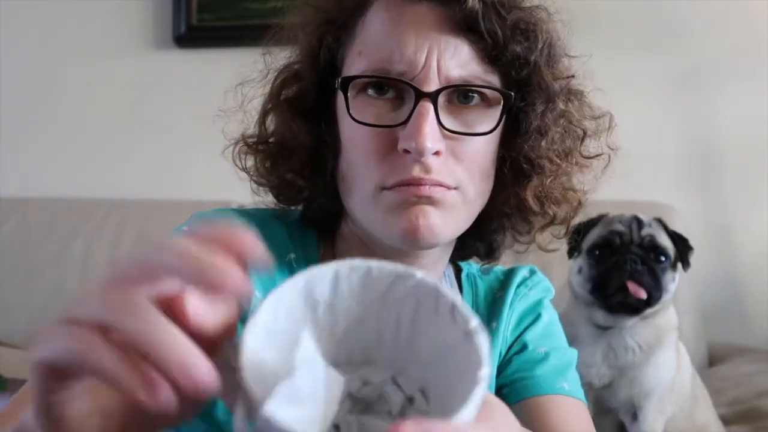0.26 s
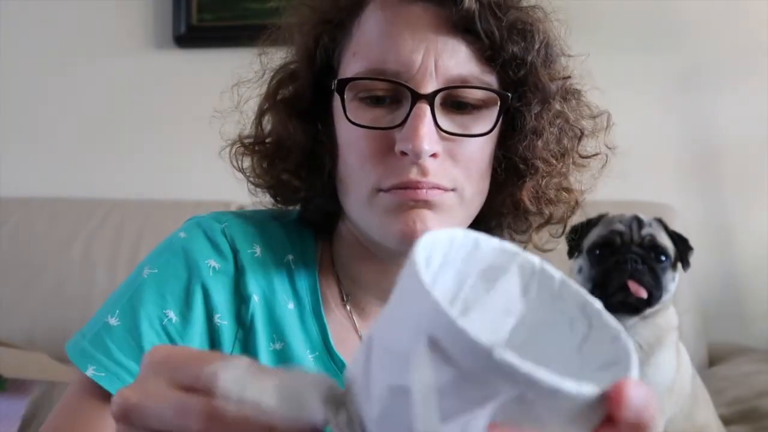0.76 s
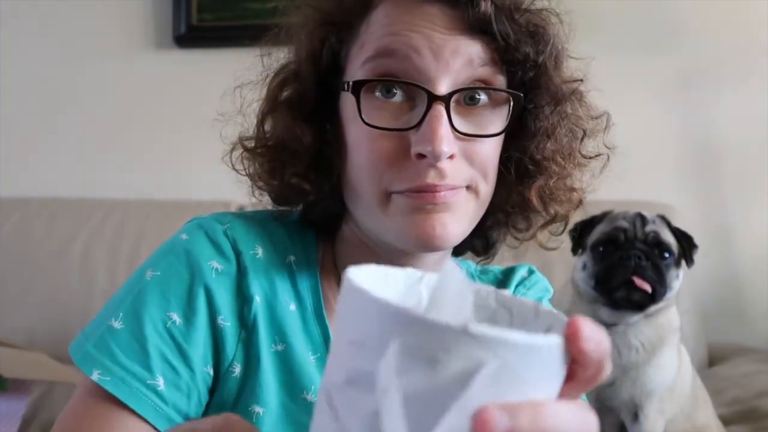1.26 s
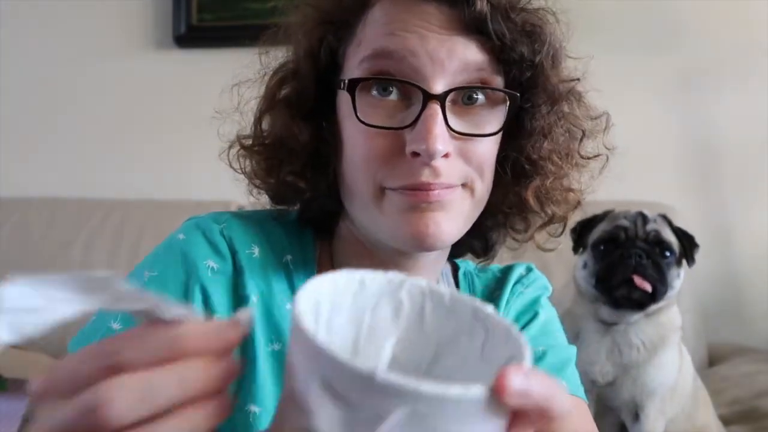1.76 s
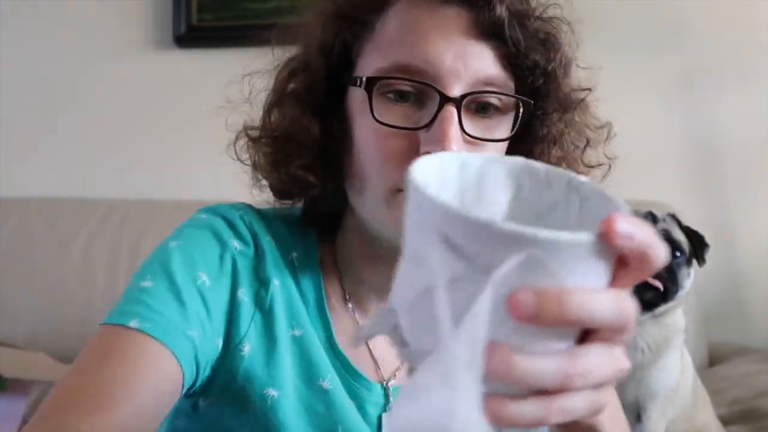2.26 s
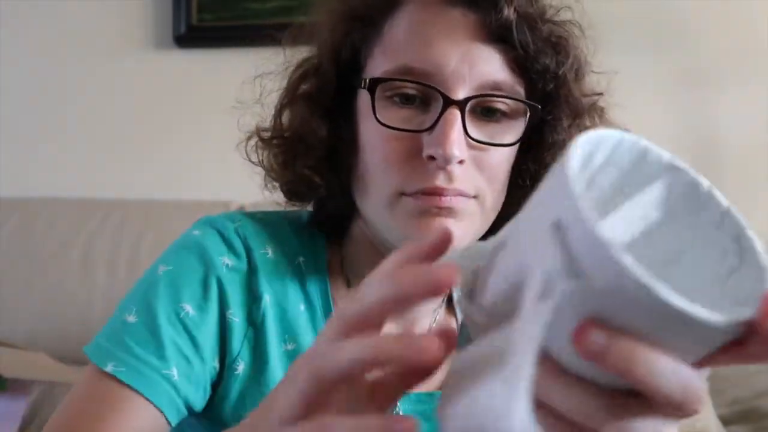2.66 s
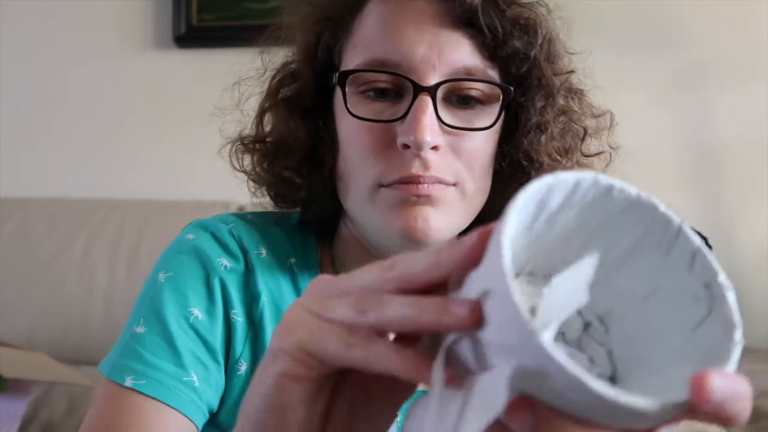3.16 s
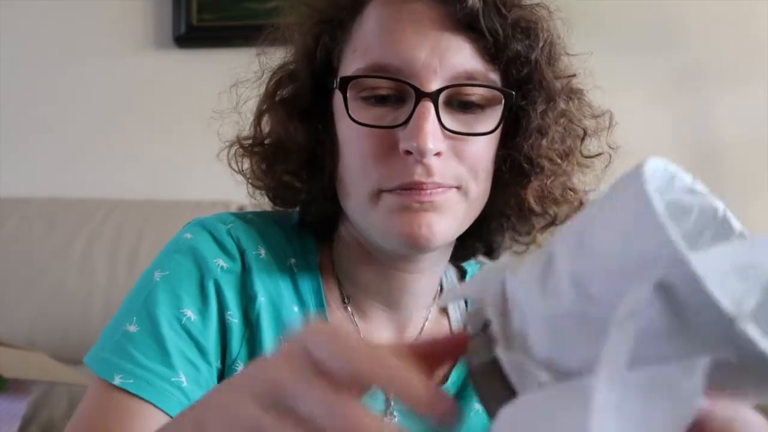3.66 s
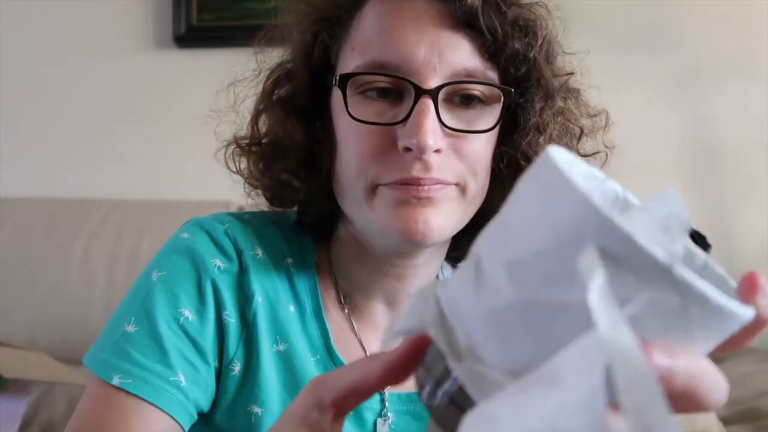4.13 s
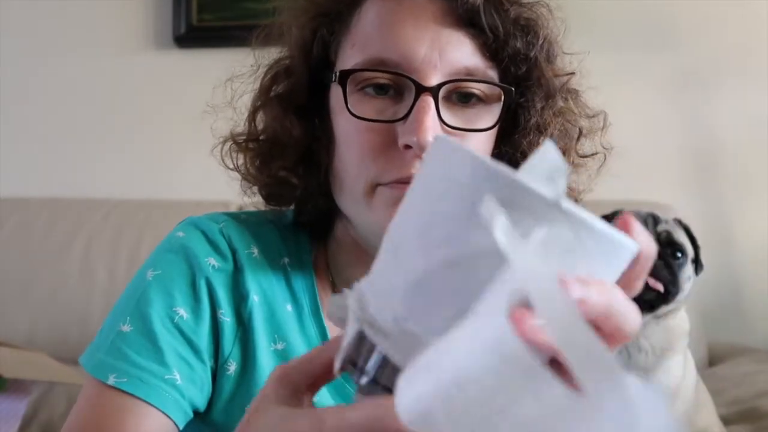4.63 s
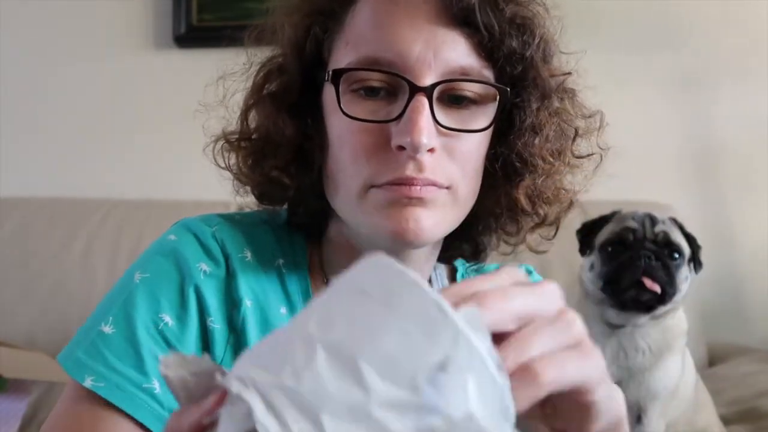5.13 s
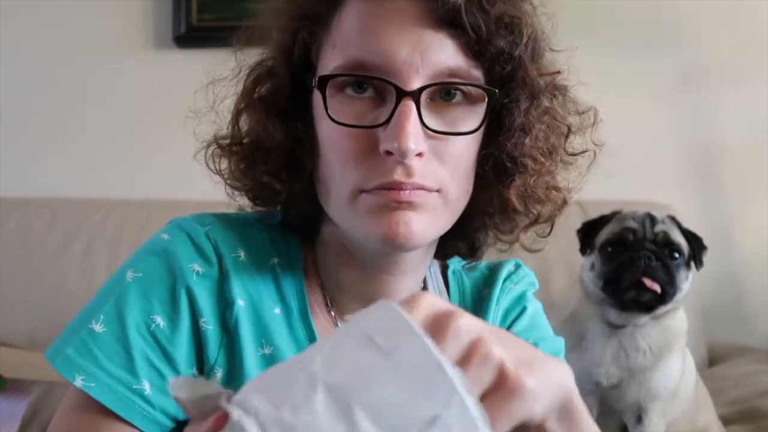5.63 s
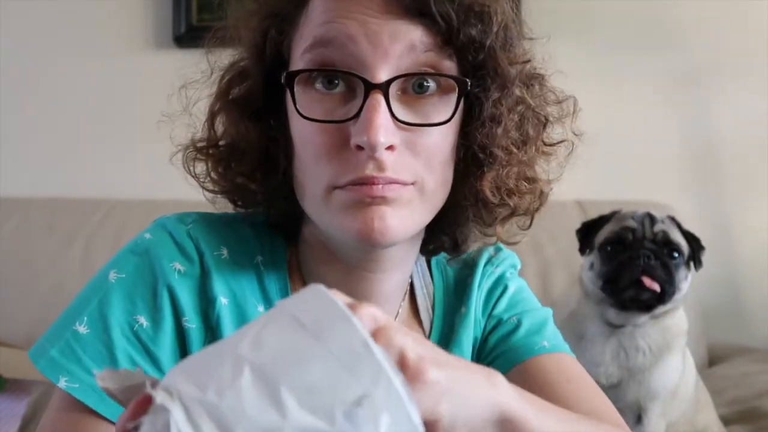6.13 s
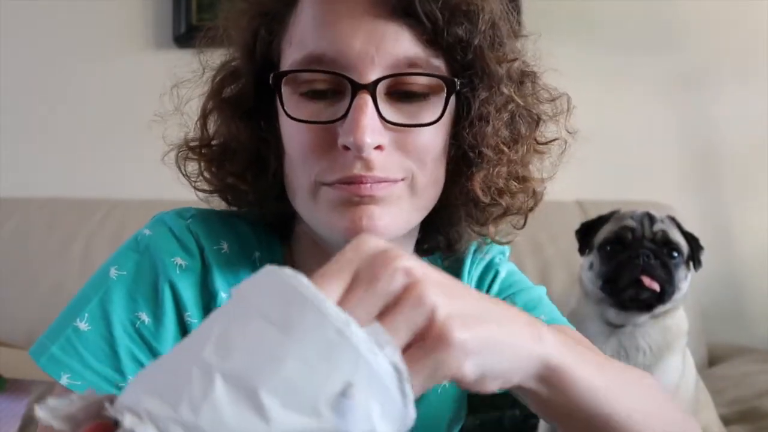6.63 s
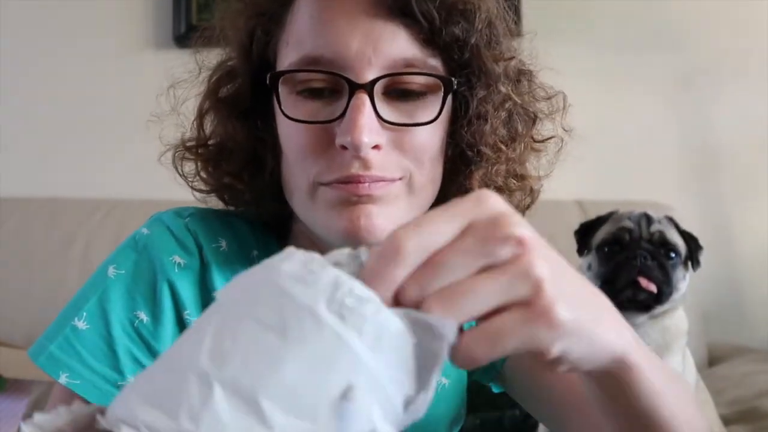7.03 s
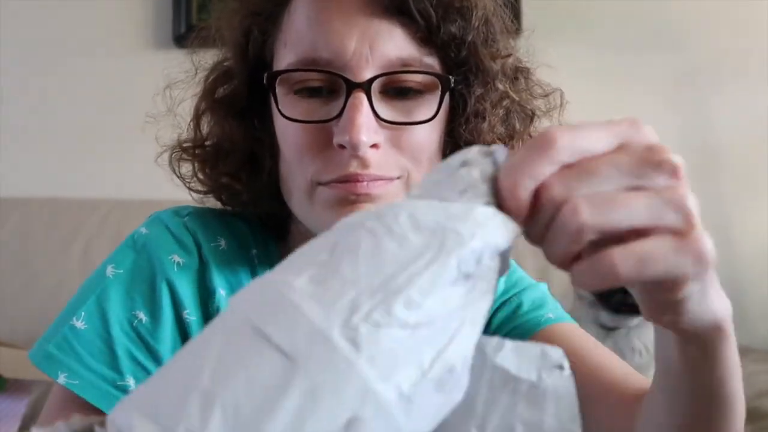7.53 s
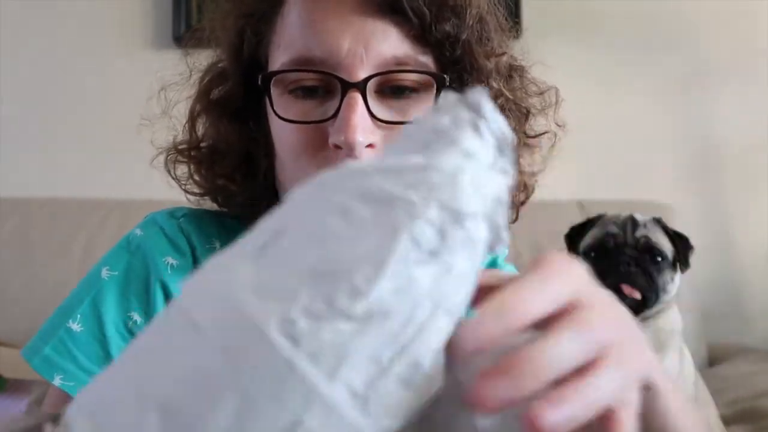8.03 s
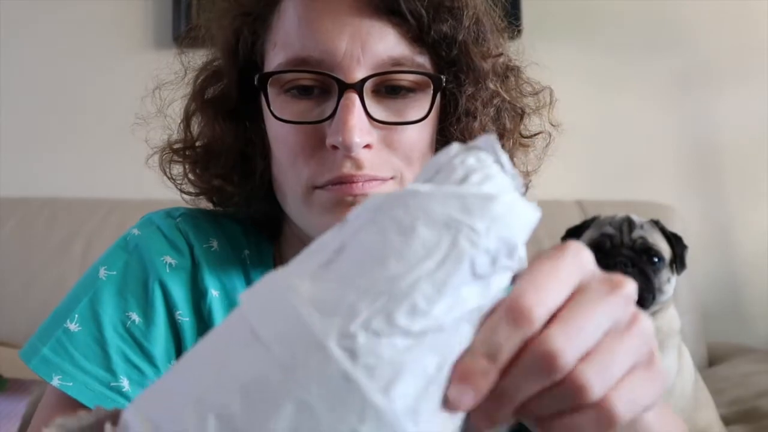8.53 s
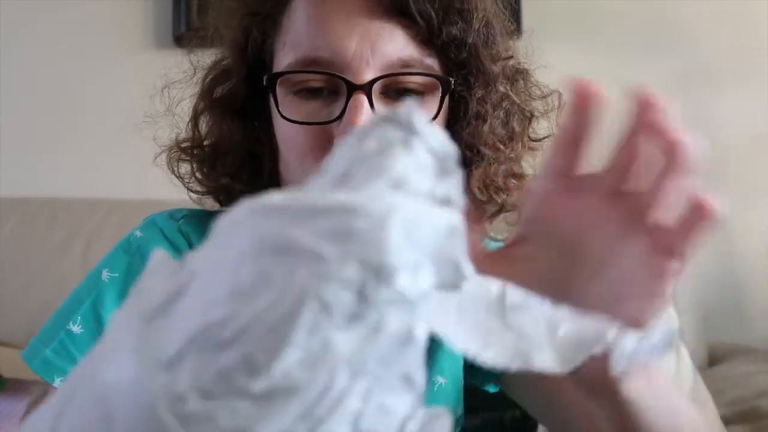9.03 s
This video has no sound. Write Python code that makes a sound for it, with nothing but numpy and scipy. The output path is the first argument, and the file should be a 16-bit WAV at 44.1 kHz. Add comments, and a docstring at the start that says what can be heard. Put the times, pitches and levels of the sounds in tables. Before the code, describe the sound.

Thin paper crackles and rustles close by as hands unwrap a drinking glass, with dull thumps and a hollow ring, growing louder in a quiet room.

```python
"""Unwrapping a drinking glass

Hands peel thin paper off a glass, close to the microphone in a quiet living room. Clouds of tiny clicks ring
at facet pitches to make the rustle; single folds snap as short sagging tones, and the paper chirps as it slips.
Damped sines and scuffs bump the glass, and resonated noise makes its hollow ring while a hand digs the paper out.
Filtered noise and two sines lie below as faint room noise and mains hum."""
import sys
import numpy as np
from scipy import signal
from scipy.fft import rfft, irfft, next_fast_len
from scipy.io import wavfile
from scipy.ndimage import uniform_filter1d

SR = 44100
rng = np.random.default_rng(int(sys.argv[2]) if len(sys.argv) > 2 else 0)


def generate_wav(signal):
    """Clip the signal to [-1, 1] and save it as 16-bit WAV at the path in sys.argv[1]."""
    frames = np.transpose(np.atleast_2d(signal))
    scaled = np.clip(frames, -1, 1) * 32767
    pcm = np.round(scaled).astype(np.int16)
    wavfile.write(sys.argv[1], SR, pcm)


N = 409688
T = np.arange(N) / SR
MODERATE_DB = -40  # effort of a moderate pull


def amp(db):
    """Turns decibels into a linear gain."""
    return 10 ** (np.asarray(db) / 20)


def unit(x):
    """Scales to rms 1."""
    return x / np.sqrt(np.mean(x ** 2) + 1e-20)


def read(points, hz):
    """Reads a spectrum on a log-frequency axis."""
    point_hz, value = np.transpose(points)
    return np.interp(np.log(hz + 1), np.log(point_hz + 1), value)


def curve(rows, axis=1):
    """Draws one column of a control table at every sample."""
    rows = np.asarray(rows)
    return np.interp(T, rows[:, 0], rows[:, axis])


def add(mix, s, sound):
    """Mixes a sound in at time s."""
    part = mix[max(round(s * SR), 0):][:len(sound)]
    part += sound[:len(part)]


def colour(x, points, size=2048):
    """Minimum-phase filter of unit energy: it shapes the tone and keeps the sharp front of clicks."""
    log_gain = np.log(amp(read(points, abs(np.fft.fftfreq(size, 1 / SR)))))
    taps = np.fft.ifft(np.exp(np.conj(signal.hilbert(log_gain)))).real
    return signal.oaconvolve(x, taps / np.linalg.norm(taps))[:len(x)]


def bands(x):
    """Splits into low, middle and high parts that sum to the whole."""
    size = next_fast_len(N)
    hz, z = np.fft.rfftfreq(size, 1 / SR), rfft(x, size)
    low = 1 / (1 + (hz / 1300) ** 8)
    below_high = 1 / (1 + (hz / 5000) ** 8)
    return [irfft(z * gain, size)[:N] for gain in (low, below_high - low, 1 - below_high)]


def wander(seconds):
    """Smooth random drift of rms 1 on the given time scale."""
    size = max(int(seconds * SR), 2)
    return unit(uniform_filter1d(uniform_filter1d(rng.standard_normal(N), size), size))


def drifting_patches(shape, frames):
    """Random time-frequency pattern of rms 1, smoothed over so many frames and over 5 bins."""
    along_time = uniform_filter1d(rng.standard_normal(shape), size=frames, axis=1)
    return unit(uniform_filter1d(along_time, size=5, axis=0))


def steady(x, size=3000):
    """Holds the short-term rms at 1 and leaves the grain."""
    return x / np.sqrt(abs(uniform_filter1d(x ** 2, size)) + 1e-12)


def resonate(x, hz, width):
    """A resonance of gain 1 whose pitch may move."""
    turn = np.exp(2j * np.pi * np.cumsum(hz * np.ones(N)) / SR)
    r = np.exp(-np.pi * width / SR)
    # shift the pitch down to zero, smooth there, shift back up
    return 2 * (turn * signal.lfilter([1 - r], [1, -r], x / turn + 1e-18)).real


# tone of the room noise, both per Hz and relative: pitch_hz, common_db (mid), apart_db (side)
ROOM_NOISE = [(30.2, -7, -27), (60.5, 4.5, -12), (130, 0, -1), (250, -1, 3), (428, -4.5, 1), (760, -9, -6),
              (1600, -10, -15.5), (3000, -12.5, -20), (5700, -15, -12.5), (12000, -33, -24.5)]
# mains hum: pitch_hz, level_db (rms)
MAINS_HUM = [(59.2, -71), (177.6, -77)]
AIR_DB, AIR_SIDE_DB = -53, -55


def background():
    """Soft room noise, wide in the low middle, with a little mains hum as two steady sines."""
    hz, common_db, apart_db = np.transpose(ROOM_NOISE)
    mid = amp(AIR_DB) * colour(rng.standard_normal(N), np.c_[hz, common_db])
    side = amp(AIR_SIDE_DB) * colour(rng.standard_normal(N), np.c_[hz, apart_db])
    for hum_hz, db in MAINS_HUM:
        mid = mid + amp(db) * np.sqrt(2) * np.sin(2 * np.pi * (hum_hz * T + rng.random()))
    return np.array([mid + side, mid - side])


# tone of the echo that still rings as the scene opens: pitch_hz, level_db (per Hz, relative)
OPENING_TONE = [(100, -29), (300, -5), (650, -1.5), (1200, -1), (2600, 5), (3800, 0.5), (5200, 0),
                (7500, -9), (10500, -25), (15500, -40)]
OPENING_DB, OPENING_T60_S = -32.5, 0.99


def opening():
    """The smooth echo of a loud crumple dies away: coloured noise under an exponential decay."""
    fade = np.exp(-np.log(1000) * T / OPENING_T60_S)
    return amp(OPENING_DB) * fade * colour(rng.standard_normal(N), OPENING_TONE)


# room decay: pitch_hz, t60_s
ROOM_DECAY = [(150, 0.26), (1000, 0.35), (4000, 0.59), (12000, 0.37)]


def room(x, gap_s=0.0027):
    """A furnished room: a diffuse noise tail, longest in the low treble and shortest in the bass."""
    hz, t, z = signal.stft(rng.standard_normal(SR // 2), SR, nperseg=256)
    decay = amp(-60 * t / read(ROOM_DECAY, hz)[:, None])
    tail = signal.istft(z * decay, SR, nperseg=256)[1]
    tail *= np.arange(len(tail)) > gap_s * SR
    return signal.oaconvolve(x, tail / np.linalg.norm(tail))[:N]


# stereo width of the handling: pitch_hz, side_db (relative to mid)
HANDLING_WIDTH = [(60, -28), (250, -16), (600, -36), (1200, -82), (2300, -85), (3300, -32), (4500, -7),
                  (7000, -4.5), (10300, 8), (14000, -1)]


def widen(x, scatter=1.58):
    """Spreads the sheet in stereo by a side signal whose phase drifts (scatter in radians), mostly in the treble."""
    hz, t, z = signal.stft(x, SR, nperseg=256)
    turn = 1j * np.exp(1j * scatter * drifting_patches(z.shape, frames=14))
    side_gain = amp(read(HANDLING_WIDTH, hz))[:, None]
    side = signal.istft(z * side_gain * turn, SR, nperseg=256)[1][:N]
    return np.array([x + side, x - side])


# a hand rubs inside the glass and stirs its air: time_s, level_db (at a moderate pull), mouth_hz
REACH_INSIDE = [(4.9, -96, 810), (5.25, -53.5, 794), (5.56, -52.5, 800), (5.6, -40, 870), (5.75, -48, 820),
                (5.95, -51, 764), (6.3, -50, 745), (7.15, -50.5, 744), (7.3, -51.5, 540),
                (8.3, -54.5, 530.2), (9.29, -56.5, 540)]
# fixed air modes of the paper-lined glass: pitch_hz, half_width_hz (of each filter pass), level_db (re the mouth)
GLASS_MODES = [(1720, 200, -5), (2420, 150, -3)]
MOUTH_HALF_WIDTH_HZ = 85
REACH_FOLLOW = 0.74  # dB of ring per dB of pull


def hollow(effort_db, waver=0.025):
    """Rubbing keeps the air in the glass ringing; the mouth resonance shifts as hand and paper cover it."""
    rubbing = rng.standard_normal(N)
    mouth_hz = curve(REACH_INSIDE, axis=2) * (1 + waver * wander(0.13))
    ring = 0
    for hz, half_width, db in [(mouth_hz, MOUTH_HALF_WIDTH_HZ, 0)] + GLASS_MODES:
        once = resonate(rubbing, hz, 2 * half_width)
        ring = ring + amp(db) * steady(resonate(once, hz, 2 * half_width))
    return amp(curve(REACH_INSIDE, axis=1) + REACH_FOLLOW * (effort_db - MODERATE_DB)) * ring


# fingers and broad paper panels thump the glass: start_s, level_db (before the attack), pitch_hz, decay_s
GLASS_BUMPS = [(.013, -20, 650, 0.0027), (.762, -36.5, 417, 0.0026), (.842, -38.5, 570, 0.0058),
               (.969, -35, 900, .002), (3.8572, -28, 1490, 0.001), (3.858, -16.5, 583, 0.0033),
               (3.868, -37.5, 904, 0.019), (3.872, -30, 287, 0.0065), (3.881, -33.5, 152, 0.016),
               (3.9, -37, 100, 0.018), (4.719, -41, 197, 0.012), (5.342, -32.5, 781, 0.0064),
               (5.575, -31, 332, 0.0032), (5.578, -18.5, 785, 0.0041), (5.581, -23, 1810, 0.0023),
               (6.833, -18.5, 344.3, 0.0017), (7.062, -22.5, 451, 0.0035), (7.349, -16, 395, 0.0043),
               (7.399, -16.5, 560, 0.0046), (7.403, -16, 230, 0.0033), (7.42, -23, 400, 0.0046),
               (8.099, -25, 273.2, .005), (8.2195, -19, 417.3, 0.0029), (8.702, -22, 210, 0.0051),
               (8.759, -17, 198.6, 0.0047), (8.786, -9, 436, 0.002), (8.809, -11, 573, 0.006),
               (8.833, -15.5, 480, 0.004)]


def bumps(scuff=0.54, rise_s=0.00016, scuff_hz=1700):
    """Dull knocks, damped by paper and palm: a decaying sine, each with a scuff of noise that just outlasts it."""
    out, t = np.zeros(N), np.arange(6000) / SR
    for s, db, hz, decay in GLASS_BUMPS:
        band = signal.butter(5, [hz / 2, min(3 * hz, scuff_hz)], "band", fs=SR, output="sos")
        rub = unit(signal.sosfilt(band, rng.standard_normal(len(t))))
        knock = np.exp(-t / decay) * np.sin(2 * np.pi * hz * t)
        knock += scuff * np.exp(-t / (1.02 * decay)) * rub
        add(out, s, amp(db) * (1 - np.exp(-t / rise_s)) * knock)
    return out


# the paper slips on the glass: peak_s, level_db (peak)
SLIP_CHIRPS = [(4.588, -6.5), (4.5924, -9), (4.596, -8), (4.6093, -12.5), (4.628, -18)]
SLIP_HZ, SLIP_S = 3300, 0.00072


def slips():
    """Each slip on the glass is a chirp of a few cycles at steady pitch, under a bell-shaped envelope."""
    out, t = np.zeros(N), np.arange(-256, 256) / SR
    bell = np.exp(-np.pi / 2 * (t / SLIP_S) ** 2)
    for s, db in SLIP_CHIRPS:
        add(out, s + t[0], amp(db) * bell * np.cos(2 * np.pi * (SLIP_HZ * t + rng.random())))
    return out


FOLDS_PER_S, FOLDS_GROWTH = 30, .65  # rate at a moderate pull; its growth in dB per dB of pull
FOLD_OVER_DB, FOLD_SPREAD_DB = 5.5, 3.5  # level above the effort; scatter of size
FOLD_HZ = 1900, 4000


def random_folds(effort_db):
    """Folds at random times, as rows like the timed ones: louder and more frequent the harder the pull."""
    rate = FOLDS_PER_S * amp(FOLDS_GROWTH * (effort_db - MODERATE_DB))
    folds = []
    for i in np.flatnonzero(rng.random(N) < rate / SR):
        db = effort_db[i] + FOLD_OVER_DB + FOLD_SPREAD_DB * rng.uniform(-1.1, 1)
        folds.append((T[i], db, rng.uniform(*FOLD_HZ)))
    return folds


# folds that snap at set times, faint to loud: peak_s, level_db (before the shared trim), pitch_hz
TIMED_FOLDS = [(.0125, -3, 2460), (.0199, -1.5, 3300), (.2812, -31, 2500), (.2855, -29, 1590),
               (.667, -26.5, 2655), (.97, -30, 2300), (.9882, -30, 2800), (1.029, -26, 3300),
               (1.036, -25, 3000), (1.079, -26, 3700), (1.1815, -22.5, 3300), (1.1985, -22, 3475),
               (1.2244, -23, 3000), (1.3418, -20, 2370), (1.409, -17, 3200), (1.4258, -18, 2940),
               (1.4363, -15, 3600), (1.5106, -13, 3180), (1.5392, -15, 3456), (1.5473, -19, 3300),
               (1.569, -9, 2850), (1.6951, -19.5, 2240), (1.7062, -25, 2602), (2.2045, -31, 3000),
               (2.4715, -34, 2200), (2.554, -34, 4200), (2.555, -35.5, 1900), (2.5838, -22, 4000),
               (2.611, -41, 3300), (2.624, -34, 2200), (2.6572, -34, 2450), (2.8307, -29.5, 2240),
               (2.8627, -29, 3000), (2.9684, -24, 3040), (3.0133, -18, 3000), (3.0635, -16.5, 3120),
               (3.164, -21.5, 3080), (3.1731, -21.5, 2900), (3.1793, -24, 2770), (3.2251, -23, 2700),
               (3.2405, -19.5, 3950), (3.3079, -24, 2990), (3.3524, -27, 2574), (3.5191, -32.5, 2500),
               (3.5573, -27, 3000), (3.9392, -29, 3170), (3.9487, -20.5, 2340), (3.9675, -15, 3300),
               (4.0636, -26, 2800), (4.0723, -23, 3890), (4.2931, -25, 2530), (4.3068, -16, 3900),
               (4.3254, -18.5, 2580), (4.3837, -23, 3850), (4.832, -21.5, 2900), (4.8625, -18, 2920),
               (4.9831, -24, 2970), (5.0695, -24, 3870), (5.0705, -24.5, 1320), (5.0718, -23, 3000),
               (5.1165, -30, 2800), (5.3395, -29.5, 3000), (5.4486, -22, 2590), (5.5054, -23, 2550),
               (5.5241, -25, 2490), (5.6602, -27, 3250), (5.6783, -23, 2500), (5.733, -23, 3100),
               (5.7964, -27, 3000), (5.9162, -21.5, 2550), (5.9383, -20, 1980), (5.9674, -17, 2220),
               (5.9915, -15, 1787), (6.2685, -22.5, 2390), (6.3734, -23, 2710), (6.4965, -23.5, 2207),
               (6.5622, -19.5, 3064), (6.7006, -22, 2205), (6.7258, -19.5, 2400), (6.8347, -16, 2750),
               (6.8658, -23, 2800), (6.8784, -16, 2920), (6.9815, -19, 2593), (7.0328, -21, 2400),
               (7.0673, -14, 2290), (7.1417, -11, 2640), (7.2833, -14.5, 2623), (7.339, -8, 2882),
               (7.4495, 2, 2790), (7.5973, -15, 3000), (7.854, -13, 2918), (7.9134, -13.5, 2588),
               (8.035, -26, 3240), (8.0998, -16, 3180), (8.1058, -24, 2820), (8.1343, -28, 2770),
               (8.1467, -17.5, 2530), (8.1973, -15, 3440), (8.2207, -16, 2220), (8.2253, -13.5, 2600),
               (8.3664, -10.5, 2600), (8.43, -13.5, 2403), (8.5452, -16, 2800), (8.5568, -15.5, 2040),
               (8.5867, -15.5, 2260), (8.6071, -16, 3570), (8.7244, -10.5, 3110), (8.7876, -1.5, 1960),
               (8.8, -5, 2300), (8.8229, -12, 3420), (8.8375, -8, 2190)]
SNAP_RING_S = 0.0003  # rise time of a flip, about one cycle of its pitch
# a flipped fold trips its neighbours: mean gap, level of the first, step for each further one, pitch scatter
CHAIN_GAP_S, CHAIN_DB, CHAIN_STEP_DB, CHAIN_OCTAVES = .0013, -8, -3.5, .45
CLEAN_BREAK_DB = -1  # a snap at or above this releases the sheet at once and trips no others


def snaps(folds, level_db=-1.4, crack_db=-8, shiver_db=-22, shiver_s=0.01, sag=0.093, count=4):
    """A fold flips with a crack, rings at a sagging pitch and trips a chain of weaker flips; the sheet shivers on."""
    flips, cracks, t = np.zeros(N), np.zeros(N), np.arange(1024) / SR
    age = t / SNAP_RING_S
    sagging_s = np.cumsum(1 + sag * (2 * np.exp(-age / 2) - 1)) / SR
    swing = age * np.exp(1 - age)
    for s, db, hz in folds:
        chain = [(s, db, hz)]
        gaps, octaves = rng.uniform(.4, 1.6, count), rng.uniform(-1, 1, count)
        if db < CLEAN_BREAK_DB:
            times = s + CHAIN_GAP_S * np.cumsum(gaps)
            levels = db + CHAIN_DB + CHAIN_STEP_DB * np.arange(count)
            chain += zip(times, levels, hz * 2 ** (CHAIN_OCTAVES * octaves))
        for at, size_db, pitch in chain:
            flip = swing * np.cos(2 * np.pi * (pitch * sagging_s + rng.random()))
            crack = np.exp(-age / 2) * rng.standard_normal(len(t))
            add(flips, at - SNAP_RING_S, amp(size_db) * flip)
            add(cracks, at - SNAP_RING_S, amp(size_db + crack_db) * crack)
        add(cracks, s, amp(db + shiver_db) * np.exp(-t / shiver_s) * rng.standard_normal(len(t)))
    return amp(level_db) * (flips + colour(cracks, LOOSE_PAPER))


# each pull or squeeze of the sheet: start_s, length_s, level_db (mid-stroke effort), swell_db (start to end)
PULLS = [(.009, 0.004, -25.5, 8), (0.245, 0.068, -52.5, -6), (0.43, 0.32, -50.5, -5.5),
         (0.742, 0.23, -42.5, 2.5), (1.03, 0.25, -42.5, 1.5), (1.371, 0.06, -30, 4),
         (1.504, 0.074, -28, 5.5), (1.594, 0.087, -47.5, 8), (1.709, 0.071, -39, -4),
         (1.827, 0.56, -56.5, -7.5), (1.979, 0.029, -50.5, 9), (2.205, 0.012, -49, -8),
         (2.597, 0.05, -57, -6), (2.821, 0.11, -48, 6), (2.967, 0.087, -37.5, 3.5), (3.092, 0.068, -48, -4),
         (3.173, 0.235, -44, -7), (3.459, 0.13, -42, 4), (3.74, 0.14, -43.5, -4.5), (3.937, 0.14, -40, -8),
         (4.075, 0.084, -42, -3), (4.276, 0.12, -40.5, -0.5), (4.419, 0.17, -36, 17),
         (4.634, 0.26, -36, -0.5), (4.881, 0.15, -46, -10), (5.068, 0.22, -45, 5.5),
         (5.337, 0.042, -41.5, 4), (5.457, 0.045, -38.5, 3), (5.572, 0.014, -37.5, -4.5),
         (5.668, 0.16, -43.5, -4.5), (5.917, 0.15, -37, 1.5), (6.107, 0.21, -47, 7.5),
         (6.354, 0.42, -38, 7.5), (6.843, 0.047, -29, -0.5), (6.954, 0.042, -34, 1.5),
         (7.042, 0.11, -26, 0), (7.217, 0.071, -35.5, 1), (7.307, 0.12, -23.5, 4.5),
         (7.516, 0.029, -31.5, 0.5), (7.597, 0.14, -32, 0), (7.857, 0.073, -31, -9),
         (8.104, 0.008, -34, -2.5), (8.137, 0.037, -40.5, 10.5), (8.227, 0.018, -29, -2.5),
         (8.262, 0.16, -29, 5.5), (8.44, 0.24, -36, -4), (8.701, 0.12, -20.5, 7.5),
         (8.848, 0.32, -39.5, -22), (9.276, 0.011, -47.5, -9)]
ATTACK_DB_PER_S, RELEASE_DB_PER_S = 455, 245.5  # the paper takes up a pull quickly and settles more slowly
HOLD_DB = -71  # stir of the sheet while it is only held
TREMOR_DB, TREMOR_S = 0.44, .015  # the hands move unevenly


def effort():
    """Drive of the rustle in dB: each stroke sets in, swells or eases while it lasts, and dies away."""
    t = T[::32]
    power = amp(HOLD_DB) ** 2
    for start, length, db, swell_db in PULLS:
        held = swell_db * (np.clip((t - start) / length, 0, 1) - .5)
        attack = ATTACK_DB_PER_S * np.maximum(start - t, 0)
        release = RELEASE_DB_PER_S * np.maximum(t - start - length, 0)
        power = power + amp(db + held - attack - release) ** 2
    return np.interp(T, t, 10 * np.log10(power)) + TREMOR_DB * wander(TREMOR_S)


def flex(x, patchy_db):
    """The bending sheet favours shifting patches of pitch."""
    z = signal.stft(x, SR, nperseg=256)[2]
    patches = drifting_patches(z.shape, frames=3)
    return signal.istft(z * amp(patchy_db * patches), SR, nperseg=256)[1][:N]


GRAIN_S = .0003, .0015  # decay times of the smallest and the largest facets
SPREAD_DB, CLUMP_DB, CLUMP_S = .8, 1.4, .003  # scatter of buckle sizes; depth and length of their clumps
RUB_DB = -4  # smooth rubbing under the buckles


def creases(effort_db, per_s, spread_db, clump_db, rub_db, ring, count=32):
    """Tiny buckles of many sizes, each ringing briefly at the pitch of its own facet, in clumps over smooth rubbing."""
    rate = per_s * amp(.6 * (effort_db - MODERATE_DB))
    sizes = amp(spread_db * np.minimum(rng.exponential(1, N), 4))
    clicks = (rng.random(N) < rate / SR) * sizes
    facet, t = rng.integers(0, count, N), np.arange(512) / SR
    facet_hz = np.geomspace(9000, 450, count)[:, None]
    decay = np.geomspace(*GRAIN_S, count)[:, None]
    tone = ring * np.sqrt(facet_hz / 3000) * np.sin(2 * np.pi * facet_hz * t)
    grains = (rng.standard_normal((count, len(t))) + tone) * np.exp(-t / decay)
    buckles = np.zeros(N)
    for k, grain in enumerate(grains):
        buckles += signal.oaconvolve(clicks * (facet == k), unit(grain))[:N]
    # the buckles come in clumps, while the rubbing runs on evenly
    clumps = amp(clump_db * np.clip(wander(CLUMP_S), -2, 2))
    return steady(buckles) * clumps + amp(rub_db) * rng.standard_normal(N)


# tone of loose and of bunched paper: pitch_hz, level_db (per Hz, relative)
LOOSE_PAPER = [(50, -26), (110, -14), (200, -7), (450, -1.5), (700, -1.5), (1150, -4), (1750, 3), (2600, 5),
               (3500, 3.5), (4400, -2.5), (5200, -9.5), (7300, -13), (10000, -26.5), (12500, -23.5),
               (15500, -34)]
BUNCHED_PAPER = [(50, -15), (110, -16.5), (170, -5), (280, -5), (480, -1), (650, 0.5), (950, -3.5),
                 (1300, 2.5), (1700, 9), (2600, 9.5), (3500, 5.5), (4300, -1.5), (5200, -12), (7500, -20.5),
                 (10500, -33.5), (12500, -28), (15500, -41)]
# shape of the sheet, before trims: time_s, flutter_db (broad panels), sheen_db (sliding paper), both re the middle
SHEET_SHAPE = [(0, -12, -4.5), (.6, -12, -12.5), (1.1, -17, -12.5), (1.4, -10.5, -8), (1.55, -12, -6.5),
               (1.75, -7.5, -10), (2.25, -14, -13), (2.5, -26, -9), (2.9, -6, -14.5), (3.3, -17.5, -10),
               (3.8, -9, -16.5), (4.3, -7.5, -10), (4.6, -19, -14), (5, -9.5, -13), (5.55, -6.5, -15),
               (6.2, -9, -23), (6.9, -4.5, -17), (7.4, -5, -14.5), (7.7, -6.5, -14.5), (8.3, -3.5, -13.5),
               (8.8, -4, -12.5), (9.29, -5, -14)]
# paper sticks and slips on the glass with a short squeak: time_s, drive_db (re the paper, before band levelling)
SQUEAK_GRIP = [(1.3, -33), (1.42, 2), (1.56, -3), (1.66, -45), (4.5, -15), (4.565, 12), (4.63, -6),
               (4.7, -37)]
SQUEAK_HZ, SQUEAK_WIDTH_HZ = 3500, 1200
FLUTTER_PER_DB = -0.1354  # a gentle pull bends the panels and buckles fewer creases


def rustle(effort_db, low_db=-1, middle_db=-2.5, high_db=0.0, crunch_db=2.5, flicker_db=0.0,
           bunch_from_s=5.72, bunch_until_s=5.87):
    """The creases sound through the sheet, which turns from loose to bunched as it is pulled from the glass."""
    drive = creases(effort_db, per_s=900, spread_db=SPREAD_DB, clump_db=CLUMP_DB, rub_db=RUB_DB, ring=0.62)
    drive = flex(drive, patchy_db=3)
    bunched = np.clip((T - bunch_from_s) / (bunch_until_s - bunch_from_s), 0, 1)
    paper = (1 - bunched) * colour(drive, LOOSE_PAPER) + bunched * colour(drive, BUNCHED_PAPER)
    squeak = resonate(paper * amp(curve(SQUEAK_GRIP)), SQUEAK_HZ, SQUEAK_WIDTH_HZ)
    low, middle, high = bands(paper + squeak)
    # broad panels give way in lumps
    bending_db = FLUTTER_PER_DB * (effort_db - effort_db.mean())
    flutter_db = low_db + curve(SHEET_SHAPE, axis=1) + bending_db + crunch_db * wander(0.017)
    # sliding layers hiss
    sheen_db = high_db + curve(SHEET_SHAPE, axis=2) + flicker_db * wander(0.012)
    sheet = amp(flutter_db) * steady(low) + amp(middle_db) * steady(middle) + amp(sheen_db) * steady(high)
    return amp(effort_db) * sheet


def scene(room_db=-13, room_side_db=-31, bass_hz=90):
    """Paper and glass near the microphone, in the room; the near sounds are thinned below about 90 Hz."""
    effort_db = effort()
    folds = snaps(TIMED_FOLDS + random_folds(effort_db))
    handling = rustle(effort_db) + folds + hollow(effort_db) + slips() + bumps()
    near = signal.sosfilt(signal.butter(2, bass_hz, "high", fs=SR, output="sos"), handling)
    side = amp(room_side_db) * room(near)
    middle = near + amp(room_db) * room(near) + opening()
    return widen(middle) + np.array([side, -side]) + background()


EDGE_HZ = 15800


def record(dry):
    """Full-scale limit, then a steep low-pass at the band edge."""
    low_pass = signal.firwin(511, EDGE_HZ, window=("kaiser", 9), fs=SR)
    return signal.oaconvolve(np.clip(dry, -1, 1), low_pass[None], "same")


dry = scene()
out = record(dry)
generate_wav(out)
```